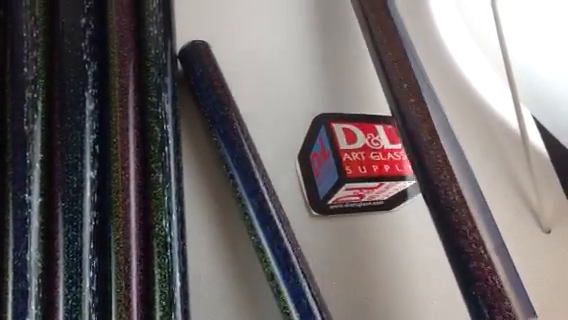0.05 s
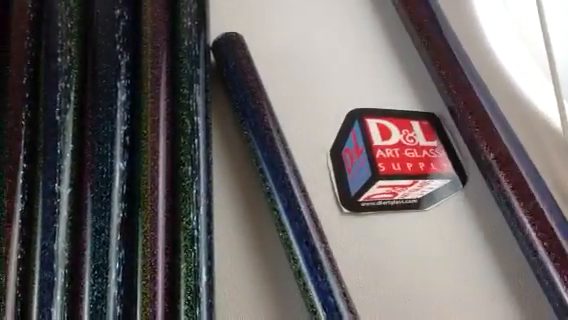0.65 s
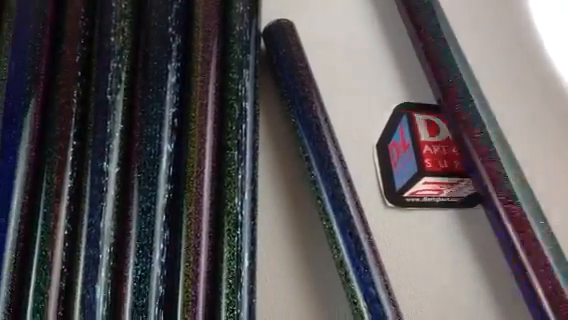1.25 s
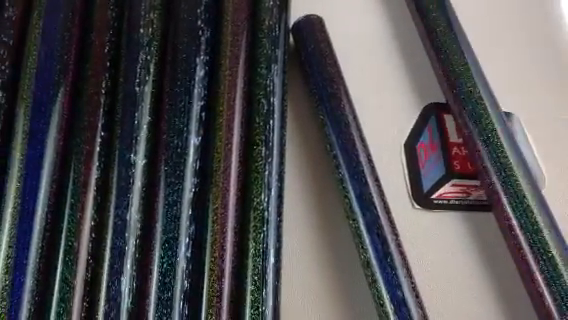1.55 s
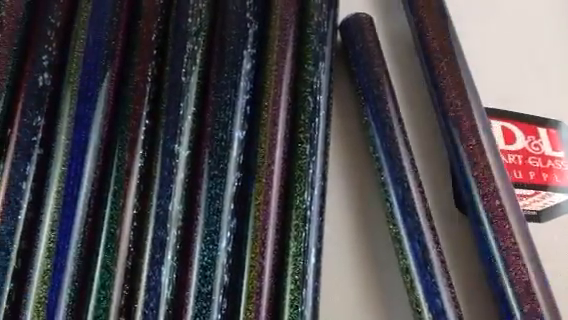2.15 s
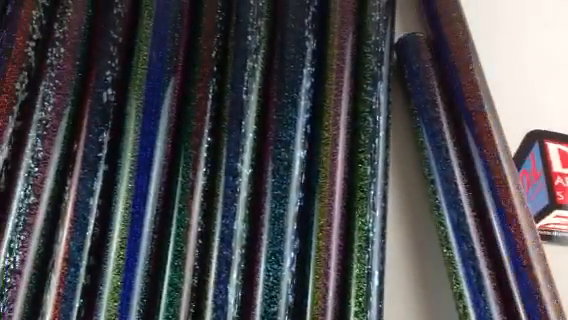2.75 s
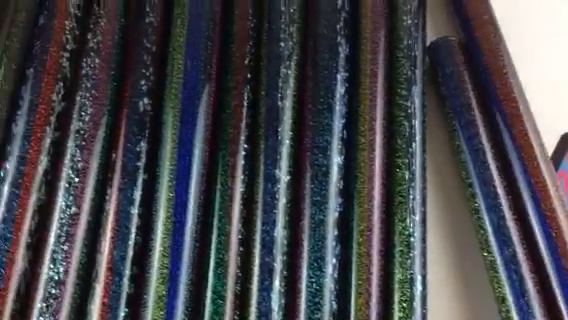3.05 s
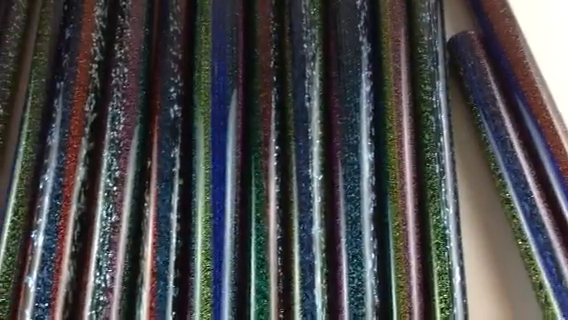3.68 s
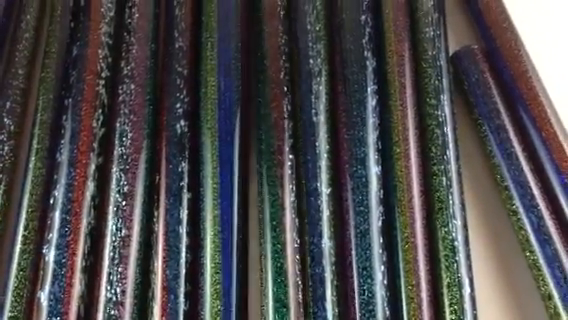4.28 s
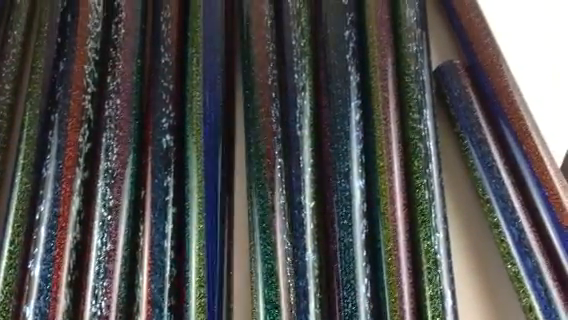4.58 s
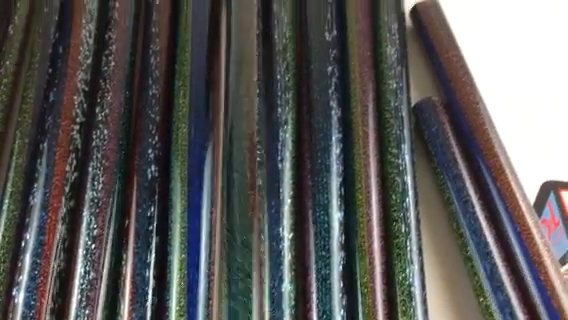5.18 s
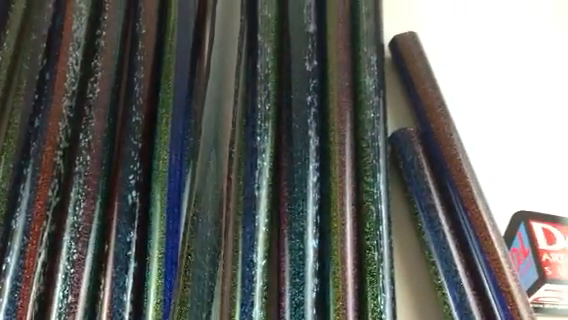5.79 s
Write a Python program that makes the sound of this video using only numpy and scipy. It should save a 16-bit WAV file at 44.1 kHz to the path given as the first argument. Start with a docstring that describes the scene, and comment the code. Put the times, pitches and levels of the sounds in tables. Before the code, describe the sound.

A glass tube rolls over a hard table and clinks against another, then more tubes are nudged with light clinks and knocks.

```python
"""Glass tubes on a table

In a small room, a hand rolls a glass tube over a hard table until it clinks against a second,
then nudges tubes in a close-packed row. Each hit makes the glass bend and ring, while the
table answers with a knock. Faint ventilation noise and a hum lie underneath."""
import sys
import numpy as np
from scipy import signal
from scipy.fft import rfft, irfft, next_fast_len
from scipy.io import wavfile
from scipy.ndimage import map_coordinates

SR = 44100
rng = np.random.default_rng(int(sys.argv[2]) if len(sys.argv) > 2 else 0)


def int16_out(signal):
    """Quantize to a 16-bit WAV file."""
    q = np.round(np.clip(np.atleast_2d(signal).T, -1, 1) * 32767)
    wavfile.write(sys.argv[1], SR, q.astype(np.int16))


N = 261513

# each tube's modes, the tones it rings with as it bends: f/Hz
TUBE_PITCHES = { "rolled": [920, 2298, 4199, 4280, 4290, 6752, 9618, 12778, 15220], "resting": [2121, 3400,
                3700, 3935, 3981, 6274, 6638, 8972, 11980], "lifted": [981, 2492, 4625, 7286, 10322, 13690],
                "neighbour": [1828, 3602, 3885, 4387, 5825, 8400, 11290, 12900, 14420], "packed": [1005,
                1750, 2304, 2680, 3671, 4457, 4830, 5981, 7494, 9055, 11310, 13910], }
# the same modes in order: level/dB, t60/s (the time to fade by 60 dB)
TUBE_MODES = { "rolled": [(-22.5, 0.13), (-14.5, 0.12), (-12, .06), (3, 0.087), (-24.5, 0.46),
              (-15.5, 0.28), (-15.5, 0.17), (-25, 0.19), (-40, 0.41)], "resting": [(-26, 0.21),
              (-9.5, 0.02), (-22, 0.098), (-16.5, 0.1), (-4.5, .12), (-27.5, .3), (-31, 0.24),
              (-25, 0.1816), (-42, .24)], "lifted": [(-35, 0.054), (0, 0.19), (0, 0.13), (-13, 0.16),
              (-24, 0.2), (-30, 0.12)], "neighbour": [(-20, 0.072), (-3.5, 0.068), (-17, 0.045),
              (-0.5, 0.047), (-7, .055), (-15, 0.059), (-30, 0.059), (-33, 0.06), (-33, .06)],
              "packed": [(-7.5, 0.09), (5, 0.029), (-1, 0.1), (8.5, 0.091), (-2, 0.17), (4.5, 0.041),
              (-9, 0.18), (-6, 0.13), (-15, 0.063), (-25.5, 0.07), (-38, 0.076), (-40, 0.088)], }
# glass hits glass: t/s, tubes, ring level/dB, brightness/(dB per octave), ring time factor,
# clack level/dB, knock level/dB
GLASS_HITS = [ (1.2053, ["rolled"], -50, 10, 1.05, -64, -44), (2.031, ["rolled"], -67, 15, 0.9, -55, -52),
              (2.7047, ["rolled", "resting"], -11.5, -0.5, 0.86, -20, -36), (2.722, ["resting"],
              -29, 0, 0.44, -22, -24), (2.7608, ["rolled"], -21, -2.5, 1.01, -12, -25), (2.77, ["resting"],
              -24, 7, 0.82, -36, -36), (3.8750, ["lifted", "neighbour"], -68, 24.5, 0.52, -47, -43),
              (3.904, ["lifted", "neighbour"], -75.5, 17, 0.6, -59, -54), (3.9720, ["lifted"],
              -76.5, -12.5, 0.65, -50.5, -69.5), (4.1745, ["packed"], -63.5, -0.5, 1.3, -60.5, -37),
              (4.2088, ["packed"], -33.5, 9.5, 0.56, -24, -24.5), (4.3575, ["packed"],
              -52.5, 3, 0.35, -42, -28), (4.4250, ["lifted"], -70.5, 7, 1.1, -74.5, -58.5),
              (4.6390, ["lifted"], -73, -20.5, 0.42, -61, -43.5), (4.8180, ["lifted", "neighbour"],
              -26, 5, 1.2, -22.5, -27), (4.983, ["lifted", "neighbour"], -64.5, 23, 1.2, -66, -40),
              (5.1818, ["lifted"], -49.5, -18.5, 0.71, -41, -35), (5.182, ["neighbour"],
              -49.5, 5, 1.1, -54.5, -44), (5.376, ["neighbour"], -70, 18, 1.03, -56, -56.5),
              (5.4254, ["lifted", "neighbour"], -61, 3.5, 1.2, -60, -47), (5.6639, ["packed", "lifted"],
              -47.5, 0.5, 0.56, -31, -35.5), ]
# tone colour of nearby tubes chattering: f/Hz, level/dB
CHATTER_SPECTRUM = [(100, -52), (400, -38.5), (900, -11), (1700, -15.5), (2900, -6), (4400, -4),
                    (5200, -11.5), (6700, -11), (8000, -19.5), (10000, -27), (15000, -48)]
# the table's main tone under each tube: f/Hz
TABLE_PITCH_UNDER = {"rolled": 910, "resting": 952.4, "lifted": 780, "neighbour": 778, "packed": 960}
# glass slides on glass or table: start t/s, end t/s, tube, level/dB, brightness/(dB per octave)
GLASS_RUBS = [(0.439, 0.52, "rolled", -70, 12), (1.221, 1.474, "rolled", -68, -7.5),
              (5.525, 5.70, "lifted", -72, 22), (5.533, 5.616, "lifted", -67.5, -27.5)]
# knocks on the table with no glass hit: a rolling tube catching as a skid begins, the body of a tap, tubes
# rocking: t/s, level/dB, main tone f/Hz
TABLE_KNOCKS = [(0.582, -36, 920), (0.769, -24.5, 1050), (1.315, -34, 1010), (1.363, -40, 1002),
                (3.149, -41, 982), (3.425, -40.5, 652), (3.579, -41.5, 527), (3.671, -36.5, 664),
                (3.701, -40.5, 622), (4.042, -45.5, 638), (4.187, -34.5, 1010)]
# tone colour of the table top: f/Hz, level/dB
TABLE_SPECTRUM = [(50, -39), (130, -6.5), (220, 1.5), (340, -16), (480, -9), (668, 0.5), (790, -14.5),
                  (930, 0), (1080, -6.5), (1400, -14), (1750, -12), (2300, -12.5), (6000, -23.5)]
# dry taps as the tube is handled: t/s, bright snap level/dB, dull body level/dB
HANDLING_TAPS = [(0.771, -36, 0), (0.7740, -52, -8), (0.8046, -39, -23), (1.2066, -37, -14),
                 (1.2625, -54, -22), (1.7094, -48, -41), (1.7902, -48.5, -43), (1.9851, -42.5, -46),
                 (2.1115, -45.5, -39), (2.1173, -53, -21.5), (2.245, -54, -50), (3.0077, -43.5, -25)]
# the modes in a tap's dull body: f/Hz, width/Hz, level/dB
TAP_MODES = [(184.5, 360, -3), (570, 470, -32.5), (1090, 125, 7), (1680, 136, 6), (2080, 124, 1),
             (2680, 370, -2), (4100, 4500, -12), (6040, 1600, -30)]
# tone colour of a tiny hard contact: f/Hz, level/dB
SNAP_SPECTRUM = [(100, -53), (1500, -25), (4000, -1.5), (7000, 1.5), (12500, -4), (15500, -5)]
# the tube rolls under the hand: start t/s, end t/s, level/dB
ROLL_SPANS = [(0.0, 1.72, -59.5), (0.47, 0.61, -50.5), (0.79, 0.83, -55), (1.32, 1.41, -52),
              (2.02, 2.24, -65.5)]
# tone colour of the rolling rumble: f/Hz, level/dB
RUMBLE_SPECTRUM = [(35, -77), (60, -39.5), (140, 1.5), (303, -2.5), (359, 0.5), (412, -20), (472, -7),
                   (541, -12), (900, -28), (1170, -98), (1980, -120)]
# tone colour of glass scraping the table: f/Hz, level/dB
SCRAPE_SPECTRUM = [(100, -45), (400, -11), (630, -2), (950, -0.5), (1400, -8.5), (1650, -7.5), (2200, -11),
                   (4400, -18), (6500, -20.5), (15000, -27)]
# the tube skids: end of rise t/s, start of fade t/s, relative level/dB, main tone f/Hz
SKID_SPANS = [(0.588, 0.641, -55, 880), (0.692, 0.715, -51.5, 1070), (0.929, 0.946, -61, 996),
              (1.311, 1.31, -58.5, 1030), (1.379, 1.375, -65, 950), (1.753, 1.78, -61.5, 2500),
              (1.891, 1.917, -55, 874), (2.114, 2.183, -69, 1080)]
# how long the room echoes: f/Hz, t60/s
ROOM_DECAY = [(150, 0.6), (900, 0.38), (4000, 0.2), (9000, 0.23), (15000, .22)]
# tone colour of the ventilation noise: f/Hz, level/dB
AIR_SPECTRUM = [(25, -48), (60, -28), (85, -22), (105, -9), (125, -7), (200, -9.5), (330, -18.5),
                (500, -19), (850, -25.5), (2400, -28.5), (13000, -35), (15500, -41.5)]
# the tones of the hum: f/Hz, early level/dB, late level/dB
HUM_TONES = [(126.5, -66, -66), (361, -66.5, -78), (637, -73.5, -90.5)]


def clinks():
    """Each hit rings the glass, clacks, sets nearby tubes chattering and knocks the table."""
    clack_hz, chatter_gain_db = 2880, -10
    landing_s = 0.00089  # a tube touches, then lands along its length
    out, t = np.zeros(N), np.arange(SR // 6) / SR
    clack = fade(t, t60=0.0096, attack=0.00033) * np.sin(2 * np.pi * clack_hz * t)
    chatter_fade = fade(t, t60=0.0084, attack=0.0003) + 0.39 * fade(t, t60=0.099, attack=0.002)
    for s, tubes, ring_db, tilt_db, ring_scale, clack_db, knock_db in GLASS_HITS:
        chatter = noise(CHATTER_SPECTRUM, len(t)) * chatter_fade
        strength = np.hypot(amp(ring_db), amp(clack_db))
        add(out, s, amp(ring_db) * sum(ring(tube, tilt_db, ring_scale) for tube in tubes))
        add(out, s, amp(chatter_gain_db) * strength * chatter)
        add(out, s + landing_s, amp(clack_db) * clack)
        add(out, s + landing_s, amp(knock_db) * knock(TABLE_PITCH_UNDER[tubes[0]]))
    return out


def ring(tube, tilt_db, ring_scale=1, attack_s=0.0007):
    """A hard, glancing touch favours the high modes; fingers and nearby tubes shorten the ring."""
    t = np.arange(SR // 3) / SR
    modes = np.zeros(len(t))
    for k, (hz, (db, t60)) in enumerate(zip(TUBE_PITCHES[tube], TUBE_MODES[tube])):
        level = amp(db + tilt_db * np.log2(hz / 4200))
        direction = (-1) ** k  # each mode swings opposite to the one before
        modes += direction * level * bending(t, hz, t60 * ring_scale)
    return modes * (1 - np.exp(-t / attack_s))


def bending(t, hz, t60, split_hz=7.8):
    """A tube bends two ways at slightly different pitches, so its tone pulses."""
    main = decay(t, t60) * np.sin(2 * np.pi * hz * t)
    along_table = decay(t, 1.6 * t60) * np.sin(2 * np.pi * (hz + split_hz) * t)
    return main + amp(-19) * along_table


def rubs():
    """Countless tiny slips keep a sliding tube singing softly, weaker as it slows."""
    out = np.zeros(N)
    for start, end, tube, db, tilt_db in GLASS_RUBS:
        size = max(round((end - start) * SR), 1)
        slips = rng.laplace(size=size) * amp(np.linspace(0, -14, size))
        song = signal.fftconvolve(slips, ring(tube, tilt_db))
        add(out, start, amp(db) * song / np.sqrt(np.mean(song[:size] ** 2)))
    return out


def knocks():
    """Tubes knock on the table alone: catching as a skid begins, under a tap, or rocking when nudged."""
    out = np.zeros(N)
    for s, db, centre_hz in TABLE_KNOCKS:
        add(out, s, amp(db) * knock(centre_hz))
    return out


def knock(centre_hz):
    """The struck table has many modes that die quickly; one stands out as a tone."""
    t = np.arange(SR // 4) / SR
    spectrum = focused(TABLE_SPECTRUM, centre_hz, db_per_octave=4)
    thud = noise(spectrum, len(t)) * fade(t, t60=0.1, attack=0.0041)
    tone = np.sin(2 * np.pi * centre_hz * t) * fade(t, t60=0.057, attack=0.0016)
    return amp(-9.5) * (thud + tone)


def taps(low_cut_hz=170):
    """Each tap is a snap plus one push into the damped tube and table, which give off no deep bass."""
    snaps, pushes = np.zeros(N), np.zeros(N)
    for s, snap_db, body_db in HANDLING_TAPS:
        add(snaps, s, amp(snap_db) * snap())
        add(pushes, s, amp([body_db]))
    body = lambda f: sum(amp(db) * hz * width / (hz * hz - f * f + 1j * f * width)
                         for hz, width, db in TAP_MODES)
    bass_cut = lambda f: (f / (f - 1j * low_cut_hz)) ** 2
    return snaps + filtered(pushes, lambda f: body(f) * bass_cut(f))


def ticks(start_s=1.99, end_s=2.19, per_second=30):
    """The tube turns in the fingers and ticks faintly at uneven intervals."""
    out = np.zeros(N)
    for s in np.arange(start_s, end_s, 1 / per_second):
        delay = rng.random() / per_second
        add(out, s + delay, amp(-55 + 3 * rng.standard_normal()) * snap())
    return out


def snap():
    """A tiny hard contact snaps brightly without ringing the glass."""
    t = np.arange(SR // 16) / SR
    shape = fade(t, t60=0.0079, attack=0.0001) + 0.21 * fade(t, t60=0.086, attack=0.001)
    return amp(1) * noise(SNAP_SPECTRUM, len(t)) * shape


def rolling():
    """The uneven tube rumbles and scrapes over the table as it gathers speed, then runs out."""
    t = np.arange(N) / SR
    level = sum(amp(db) * swell(t, start, end, rise=0.18, t60=0.202) for start, end, db in ROLL_SPANS)
    rumble = unit(noise(RUMBLE_SPECTRUM, N) * amp(1.6 * wobble(40)))
    scrape = unit(noise(SCRAPE_SPECTRUM, N) * amp(3.3 * wobble(220)))
    return level * (rumble + amp(-10) * scrape)


def skids(rise_s=0.024, sharpness=18):
    """A skidding tube scrapes in small grains, coloured by the spot it slides over."""
    out, t = np.zeros(N), np.arange(SR // 3) / SR
    for start, end, db, centre_hz in SKID_SPANS:
        scrape = noise(focused(SCRAPE_SPECTRUM, centre_hz, db_per_octave=1), len(t))
        table_mode = lambda hz: 1 / (1 + (sharpness * (hz / centre_hz - 1)) ** 2)
        tone = unit(filtered(rng.standard_normal(len(t)), table_mode))
        level = amp(db - 1.5) * swell(t, rise_s, rise_s + end - start, rise_s, t60=0.2)
        add(out, start - rise_s, level * (scrape + amp(-0.5) * tone))
    grains = unit(amp(2.5 * wobble(180)))
    return out * grains


def room(x):
    """The room gives a smooth echo that dies sooner in the treble."""
    hz, t, bands = signal.stft(rng.standard_normal(SR // 2), SR, nperseg=256)
    fades = fade(t, along(ROOM_DECAY, hz)[:, None], attack=0.0037)
    _, tail = signal.istft(bands * fades, SR, nperseg=256)
    return signal.fftconvolve(x, tail / np.linalg.norm(tail))[:N]


def ventilation(air_db=-62):
    """Air rushes steadily, with a wavering hum whose upper tones fade down early on."""
    t = np.arange(N) / SR
    out = amp(air_db) * noise(AIR_SPECTRUM, N)
    for hz, early_db, late_db in HUM_TONES:
        level = amp(np.interp(t, [1.6, 2.3], [early_db, late_db]) + 1.33 * wobble(3.1))
        out += level * np.sqrt(2) * np.sin(2 * np.pi * hz * t + 0.3 * wobble(12))
    return out


def focused(spectrum, centre_hz, db_per_octave):
    """The spot touched picks which modes answer: those far from the centre pitch are weaker."""
    return [(hz, db - db_per_octave * abs(np.log2(hz / centre_hz))) for hz, db in spectrum]


def amp(db):
    """Turn decibels into a gain."""
    return 10 ** (np.asarray(db) / 20)


def unit(x):
    """Scale to an average (rms) level of 1."""
    return x / np.sqrt(np.mean(x ** 2) + 1e-20)


def along(points, hz):
    """Read between (f/Hz, value) points on a log frequency axis."""
    freqs, values = np.transpose(points)
    return np.interp(np.log(hz + 1), np.log(freqs + 1), values)


def filtered(x, response):
    """Multiply each frequency in x by response(hz)."""
    size = next_fast_len(len(x) + 8192)
    gains = response(np.fft.rfftfreq(size, 1 / SR))
    return irfft(rfft(x, size) * gains, size)[:len(x)]


def noise(spectrum, size):
    """Noise with the given tone colour, at level 1."""
    return unit(filtered(rng.standard_normal(size), lambda hz: amp(along(spectrum, hz))))


def wobble(rate):
    """A smooth curve through `rate` random points a second."""
    points = rng.standard_normal(int(N * rate / SR) + 4)
    return map_coordinates(points, [np.arange(N) * rate / SR])


def decay(t, t60):
    """Fall by 60 dB every t60 seconds."""
    return np.exp(-np.log(1000) * t / t60)


def fade(t, t60, attack):
    """Rise quickly, then die away; times in seconds."""
    return decay(t, t60) * (1 - np.exp(-t / attack))


def swell(t, start, end, rise, t60):
    """Rise until the start, hold until the end, then die away."""
    return np.clip(1 + (t - start) / rise, 0, 1) ** 2 * decay(np.maximum(t - end, 0), t60)


def add(track, s, sound):
    """Mix a sound into the track at s seconds."""
    start = max(round(s * SR), 0)
    track[start:start + len(sound)] += sound[:N - start]


def scene(echo_db=-15):
    """Tubes and table close by, the room behind them, in one channel."""
    noises = ventilation() + rolling() + skids()
    contacts = clinks() + rubs() + knocks() + taps() + ticks()
    return (contacts + amp(echo_db) * room(contacts) + noises)[None]


def record(dry, top_hz=15450):
    """Cut away the very highest treble."""
    return np.array([filtered(x, lambda hz: np.clip((top_hz - hz) / 200, 0, 1)) for x in dry])


dry = scene()
out = record(dry)
int16_out(out)
```